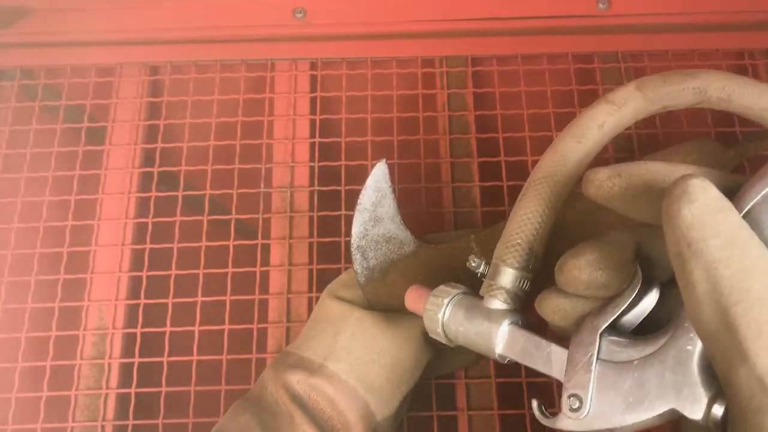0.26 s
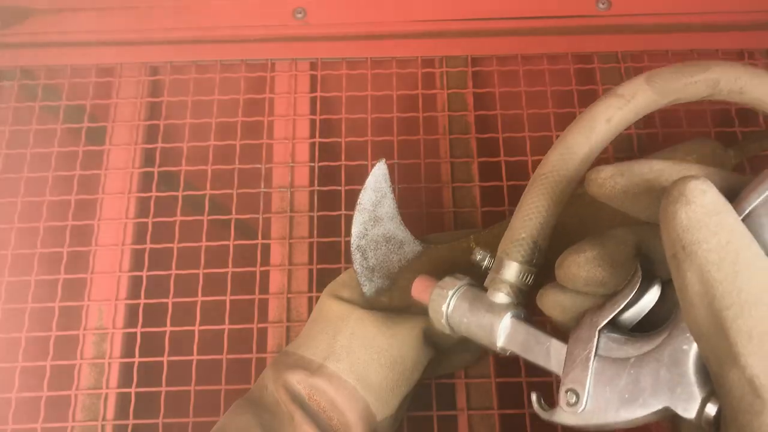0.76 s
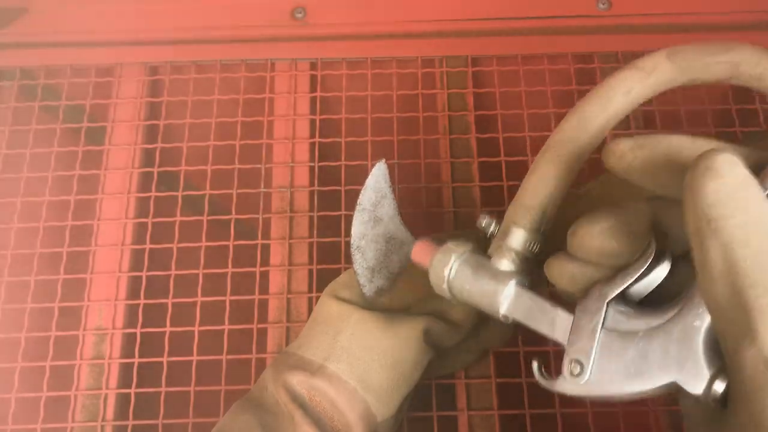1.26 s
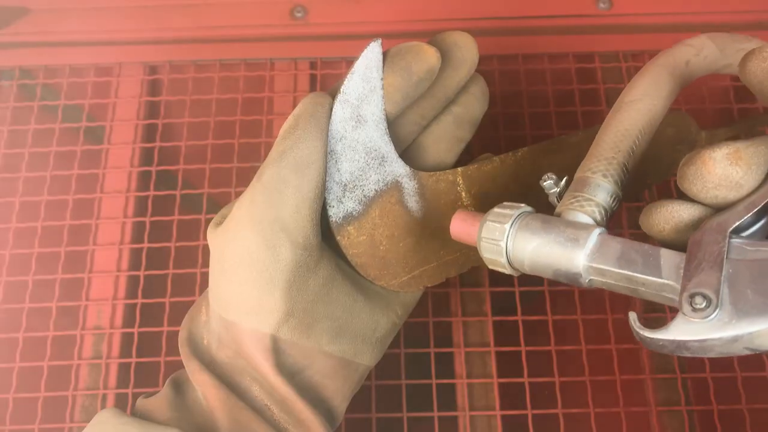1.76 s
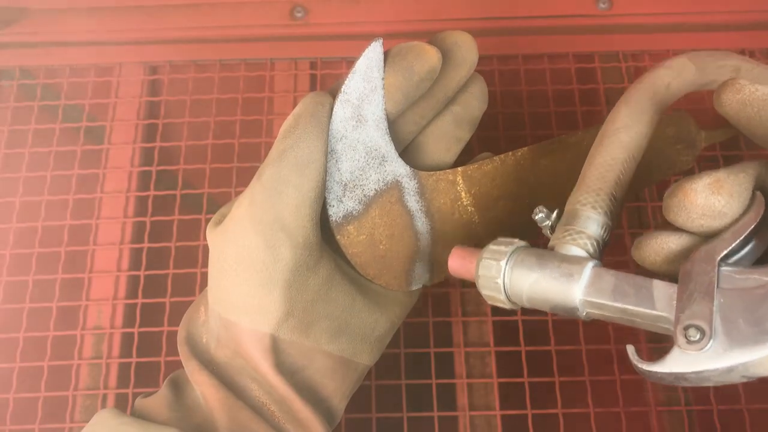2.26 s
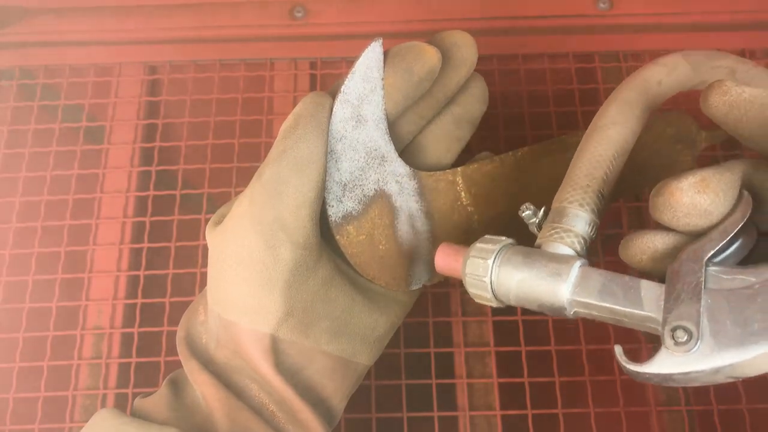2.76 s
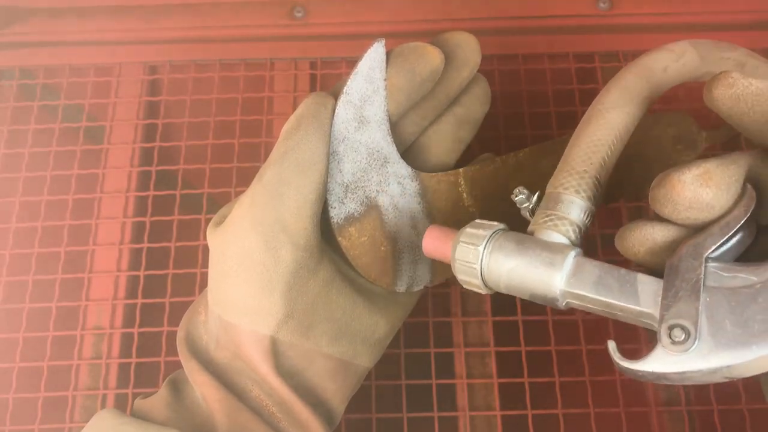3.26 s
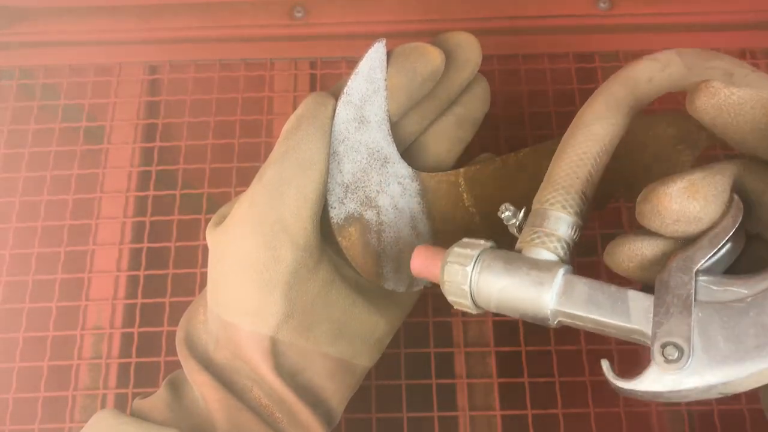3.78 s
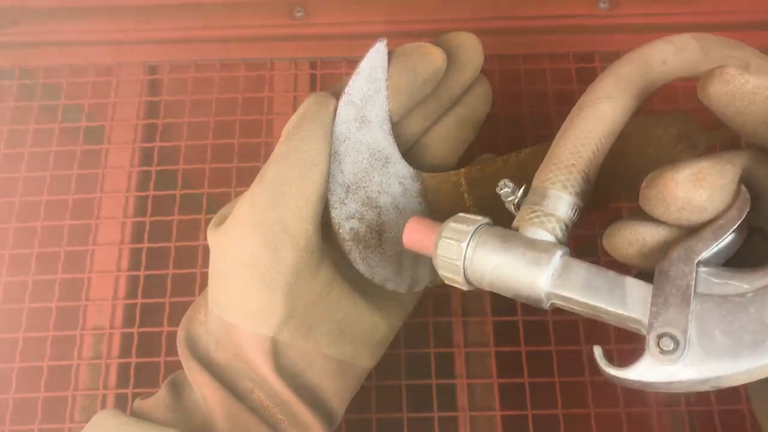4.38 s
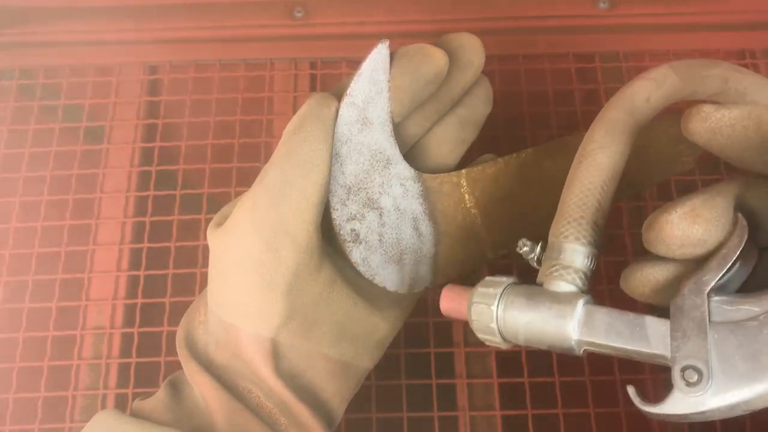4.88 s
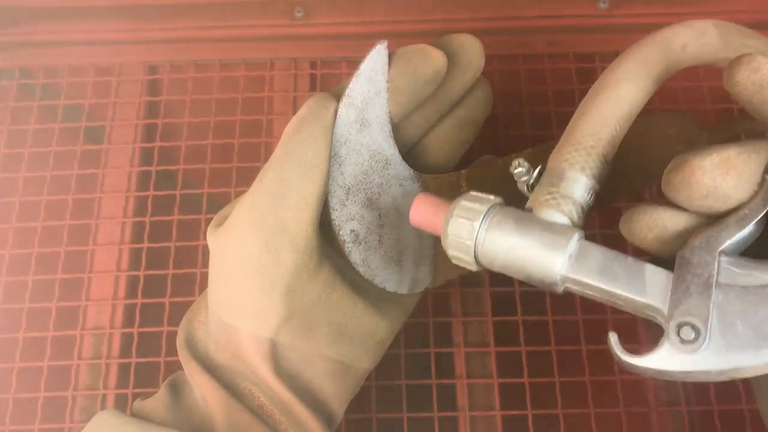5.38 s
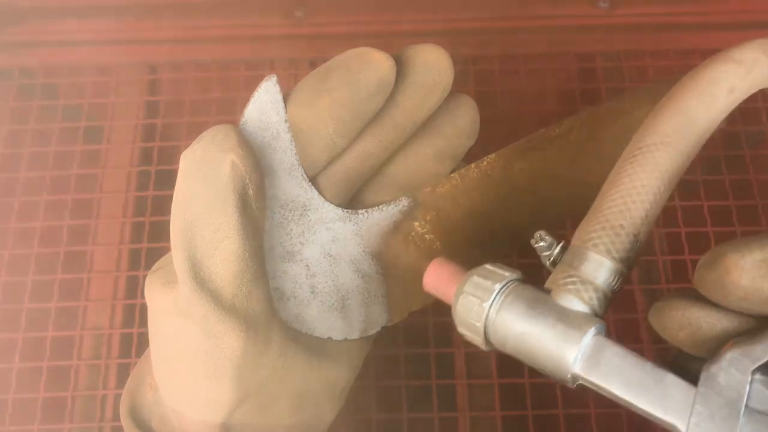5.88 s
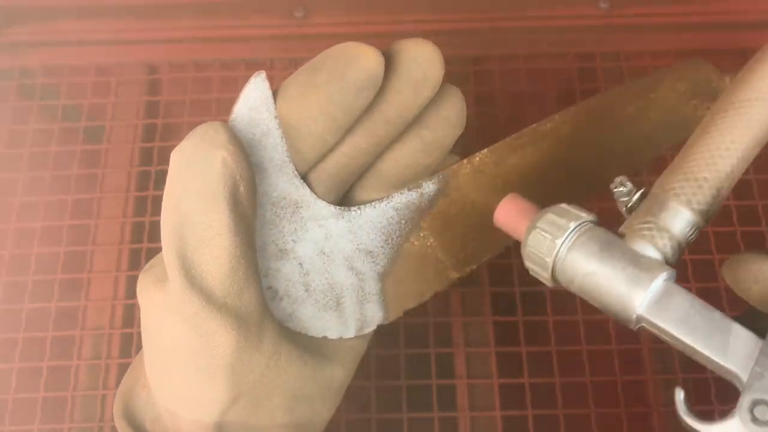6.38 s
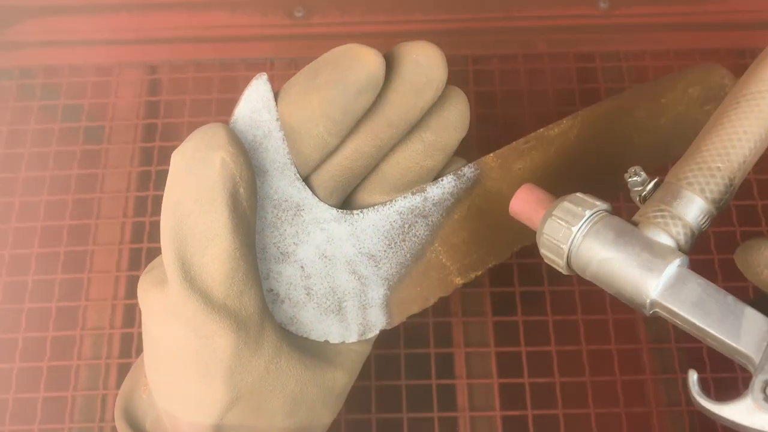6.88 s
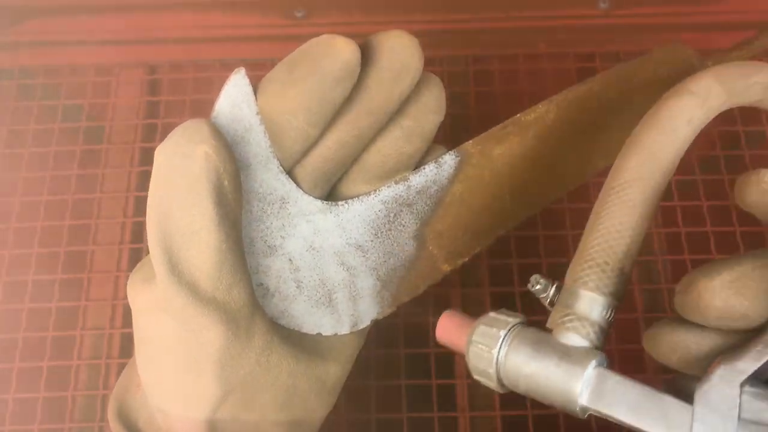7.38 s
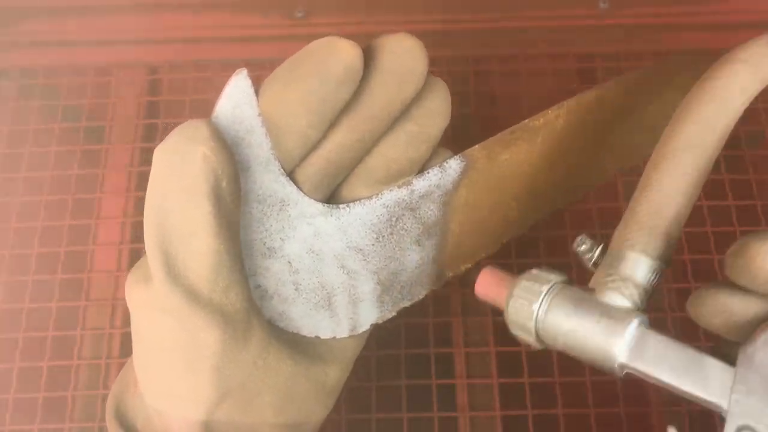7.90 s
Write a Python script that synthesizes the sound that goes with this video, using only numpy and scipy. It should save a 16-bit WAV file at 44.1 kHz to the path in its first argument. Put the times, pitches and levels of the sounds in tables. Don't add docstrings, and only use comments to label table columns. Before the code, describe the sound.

Dense gritty spray strikes steel, sputtering unevenly, with quick swells as the jet crosses edges. First it is bright and lively, then after a cut more even and drawn out, then after another cut calmer hiss broken by sharp metallic swishes. Under everything run an extractor's motor whine, a second fan's whistle and boxy air rush. Close two-channel microphone in a small metal cabinet.

```python
import sys
import numpy as np
from scipy import signal
from scipy.fft import rfft, irfft, next_fast_len
from scipy.io import wavfile
from scipy.ndimage import uniform_filter1d

SR = 44100
rng = np.random.default_rng(int(sys.argv[2]) if len(sys.argv) > 2 else 0)


def log_audio(samples):
    frames = np.atleast_2d(samples).T
    limited = np.clip(frames, -1, 1)
    pcm = np.round(limited * 32767).astype(np.int16)
    wavfile.write(sys.argv[1], SR, pcm)


def gain_from_db(level_db):
    decades = np.asarray(level_db, float) / 20
    return 10 ** decades


N = 358974
T = np.arange(N) / SR
HZ = np.maximum(np.fft.rfftfreq(next_fast_len(N), 1 / SR), 1)

# start_s, end_s
HOLDS = [
    (0, 1.506),
    (1.506, 5.666),
    (5.666, 8.14),
]
GATES = [uniform_filter1d(1. * ((T >= start_s) & (T < end_s)), size=90, mode="nearest")
         for start_s, end_s in HOLDS]

# freq_hz, density_db_per_hz
GRIT_SPECTRUM = [(5000, -30.5), (7600, -8), (8800, -4), (9700, -2.5), (10700, -2.5), (12050, 0.5),
                 (13000, -3), (13900, -3.5), (14500, -7.5), (15800, -11)]
# freq_hz, width_hz, level_db
PANELS = [(2450, 99, -20), (2783, 75, 5.5), (3116, 71, 3.5), (3377, 92, 3.5), (3578, 36, 6.5),
          (3843, 33, 6.5), (4057, 25, 7.5), (4443, 75, 6.5), (4735, 59, 6.5), (4930, 110, 5.5),
          (5400, 86, -6)]
# freq_hz, width_hz, level_db
BLADE_TIP = [(5530, 51, -13), (7250, 150, -9), (8470, 33, -10), (9060, 48, -6), (9350, 51, -5),
             (9790, 220, -3), (10100, 110, -5), (10400, 100, -5), (10700, 120, -5), (11400, 70, -2),
             (12070, 170, 1), (12400, 43, -3), (13600, 54, -3), (14800, 93, -9)]
BLADE_FACE = [(5540, 100, -19), (5850, 48, -6), (6490, 54, -4), (6780, 32, -5), (7270, 45, -6),
              (7680, 110, -12), (8030, 90, -6), (9980, 110, -3), (11100, 70, -3), (11400, 120, -2),
              (12050, 90, 1), (13300, 71, -2), (13900, 66, -2), (15000, 200, -8)]
BLADE_HEEL = [(5480, 130, -8), (5830, 160, -9), (6740, 330, -7), (7220, 89, -5), (8200, 400, -9),
              (9140, 93, -4), (9670, 53, -1), (10400, 43, -2), (11100, 61, -1), (12070, 200, -1.5),
              (12800, 120, -1), (13700, 330, 0), (14500, 49, -5), (14800, 120, -6)]
FINE_OVER_DB = [-2.5, 1, -2]


def blasting():
    patter = ports(grains, over_hz(ALIKE))
    ring = ports(grains, 0.4)
    low = ports(grains, over_hz(ALIKE))
    panel_rattle = heard(low * modes(PANELS, flip=True))
    fine = 1 / (1 + (12500 / HZ) ** 16)
    feed_gain = gain_from_db(1.22 * walk(22))
    spot_gain = gain_from_db(2.35 * walk(16))
    grit_db, low_db = sweep()
    pivot_db = -36.5
    swell_db = pivot_db + 1.03 * (grit_db - pivot_db) + 2 * walk(13)
    blades = (BLADE_TIP, BLADE_FACE, BLADE_HEEL)
    lower_ring_db, upper_ring_db = (-3.0, 2.0, -2.0), (-3.5, -2.5, -3)
    split_hz = 7900
    out = 0
    for gate, over_db, blade, lower_db, upper_db in zip(
            GATES, FINE_OVER_DB, blades, lower_ring_db, upper_ring_db):
        fine_db = swell_db + over_db
        place = echoes(t60_s=.05, wet_db=-3)
        bright = patter * gain_from_db(over_hz(GRIT_SPECTRUM)) * place
        upper = ring * modes([m for m in blade if m[0] >= split_hz], flip=True)
        lower = heard(ring * modes([m for m in blade if m[0] < split_hz], flip=True))
        thud = .4 * heard(low * resonance(6600, 1200, 0) ** 2 * place)
        coarse = heard(bright * (1 - fine)) + gain_from_db(upper_db) * spot_gain * heard(upper * (1 - fine))
        finest = heard(bright * fine) + gain_from_db(upper_db - 3.0) * heard(upper * fine)
        steel = gain_from_db(grit_db) * coarse + gain_from_db(fine_db) * finest
        steel = steel + gain_from_db(low_db) * (thud + gain_from_db(lower_db) * lower)
        spent_grit = gain_from_db(0.72 * grit_db - 25.5) * panel_rattle
        out = out + gate * (steel + spent_grit)
    return out * gain_from_db(2.5) * feed_gain


# time_s, grit_on_steel_db, thick_part_ring_db
AIM = [(0, -33.5, -43.5), (.8, -34, -45.5), (1.5, -33, -44), (1.52, -36.5, -40), (1.9, -40, -51.5),
       (2.45, -38, -44), (2.95, -38, -48), (3.15, -36.5, -39), (3.5, -37, -46.5), (3.95, -35.5, -42),
       (4.25, -32.5, -38), (4.75, -35, -40), (4.97, -38.5, -47), (5.3, -32.5, -36.5), (5.65, -35, -38.5),
       (5.92, -40.5, -49.5), (6.1, -38, -51), (8.14, -36.5, -51)]
# time_s, half_length_s, grit_lift_db, ring_lift_db
STROKES = [(0.005, 0.05, 6, 9), (0.217, 0.018, 2.5, 6), (0.377, 0.062, 4.5, 4), (.465, .03, -2.5, -6),
           (.555, 0.019, 5.5, 10.5), (.715, .05, 4, 3), (0.967, .035, 2.5, 7), (1.06, .03, 2.5, 4),
           (1.258, .04, 3, 6), (1.53, 0.029, 3, 4.5), (2.23, 0.065, 6.5, -4), (2.607, 0.088, 2, 5),
           (2.765, .035, 0, 5.5), (3.302, 0.082, 1, 3), (3.6, .03, 1.5, 3), (3.677, .025, -1.5, 9),
           (3.74, 0.064, 3, 4.5), (4.27, 0.013, -0.5, 5), (5.54, 0.025, 2.5, 2), (5.845, 0.027, 5, 9.5),
           (6.025, 0.04, 5.5, 10), (6.235, 0.035, 3, 12), (6.465, 0.049, 10.5, 19), (6.915, 0.1, 7, 16.5),
           (7.237, 0.04, 5, 6), (7.436, 0.027, 8.5, 11), (7.589, .025, 8.5, 10), (7.735, 0.022, 10, 15),
           (7.935, 0.028, 7.5, 12), (8.075, 0.053, 5.5, 18.5)]


def sweep():
    grit_db, low_db = over_time(AIM)
    for time_s, half_s, grit_lift_db, ring_lift_db in STROKES:
        bell = np.exp(-((T - time_s) / half_s) ** 2)
        grit_db = grit_db + grit_lift_db * bell
        low_db = low_db + ring_lift_db * bell
    return grit_db, low_db + 1.5 * walk(14)


def grains(spread_db=3.0):
    hardness_db = spread_db * np.minimum(rng.exponential(size=N), 5)
    return rng.standard_normal(N) * gain_from_db(hardness_db)


# freq_hz, density_db_per_hz
JET_SPECTRUM = [(1410, -46), (2400, -13), (2520, -32), (2810, -15.5), (3040, -31.5), (3530, -13.5),
                (4570, -9), (5180, -9.5), (6600, -6.5), (7660, -7.5), (11800, -3), (13900, 1), (15600, -6)]


def jet():
    hiss = ports(turbulence, .95 * over_hz(ALIKE))
    direct = heard(hiss * gain_from_db(over_hz(JET_SPECTRUM)) * (HZ > 2300) * echoes(t60_s=.06, wet_db=-3))
    drumming = heard(hiss * modes(PANELS, flip=True))
    return (direct + gain_from_db(-20.0) * drumming) * gain_from_db(-31.5 + duck() + 1.0 * walk(12))


def turbulence():
    return rng.standard_normal(N)


def extractor():
    return (motor() + second_fan() + air_rush()) * gain_from_db(duck())


# shaft_order, level_db_rms, left_minus_right_db, left_lead_rad
SHAFT_ORDERS = [(1, -59, 0, -.5), (2, -55, 0, -.3), (3, -66, 0, -.3), (4, -55, -1, -.2), (5, -51, 0, -.5),
                (7, -51, 0, -.9), (8, -50.5, -1, -1.0), (9, -60, 0, -.7), (10, -62, 0, -.7),
                (12, -56.5, -3, -.7), (13, -60, 0, 1.2), (14, -64, 3, 1.5), (15, -58, -3, 1.2),
                (16, -45, -6, 1.0), (17, -67, -2, 1.0), (20, -67, -2, 1.5), (26, -65, 0, .5),
                (28, -61, 0, -.2)]
SKIPS = [
    (.266, 0),
    (-.243, .49),
]


def motor():
    order_16_hz = 2219.6 + 1.0 * T + sag(start_s=6.86, lowest_s=7.03, back_s=7.27, loss_hz=5.5)
    turns = np.cumsum(order_16_hz / 16) / SR
    shaft_skips = np.transpose(SKIPS)[0]
    orders = [(tone(order * turns, level_db, pan_db, lead_rad) * splice(shaft_skips, order)).real
              for order, level_db, pan_db, lead_rad in SHAFT_ORDERS]
    orders[0] = orders[0] * gain_from_db(4.5 * GATES[0])
    mains = tone(300.5 * T, -65.5, 0, -.3).real
    return sum(orders) * gain_from_db(0.11 * walk(25.07)) + mains


# time_s, pitch_hz
WHISTLE = [(0, 1538.3), (2.9, 1536), (3.7, 1539), (5.66, 1539), (5.68, 1537.6), (7.45, 1537.5),
           (8.14, 1540.5)]


def second_fan():
    pitch_hz = over_time(WHISTLE)[0] + sag(start_s=6.87, lowest_s=7.07, back_s=7.42, loss_hz=11)
    turns = np.cumsum(pitch_hz) / SR
    fan_skips = np.transpose(SKIPS)[1]
    return (tone(turns, -39 + 0.13 * walk(30), 0, -0.84) * splice(fan_skips, 0.96)).real


# freq_hz, density_db_per_hz
RUSH_SPECTRUM = [(25, -42), (70, -60), (105, -67), (180, -29.5), (260, -22.5), (350, -37), (620, -17.5),
                 (900, -10), (1300, -19), (1450, -14), (1600, -17), (2100, -16.5), (2500, -26.5),
                 (4000, -62)]
# freq_hz, width_hz, level_db
HOLLOW = [(480, 9.3, -4), (504.7, 30, 3), (826, 11.6, -5), (1074, 56, -5), (1206, 47, -8), (1996, 120, -16)]


def air_rush():
    low_cut = 1 / np.hypot(1, (125 / HZ) ** 2)
    color = np.hypot(gain_from_db(over_hz(RUSH_SPECTRUM)), abs(modes(HOLLOW)))
    return heard(ports(turbulence, over_hz(ALIKE)) * low_cut * color) * gain_from_db(-37.5)


def tone(turns, level_db, pan_db, lead_rad):
    side = gain_from_db(pan_db / 2) * np.exp(.5j * lead_rad)
    return np.outer([side, 1 / side], np.sqrt(2) * gain_from_db(level_db) * np.exp(2j * np.pi * turns))


def splice(skips, order):
    skipped_turns = np.cumsum([0, *skips])
    return sum(gate * np.exp(2j * np.pi * order * turns) for gate, turns in zip(GATES, skipped_turns))


def sag(start_s, lowest_s, back_s, loss_hz):
    return -np.interp(T, [start_s, lowest_s, back_s], [0, loss_hz, 0])


def resonance(freq_hz, width_hz, level_db):
    damping = 1j * width_hz * HZ
    return gain_from_db(level_db) * damping / (freq_hz ** 2 - HZ ** 2 + damping)


def modes(table, flip=False):
    return sum((-1) ** (k * flip) * resonance(*row) for k, row in enumerate(table))


def echoes(t60_s, wet_db):
    taps = 4096
    tail = rng.standard_normal((2, taps)) * np.exp(-np.log(1000) * T[:taps] / t60_s)
    tail = tail / np.sqrt(np.sum(tail ** 2, axis=1, keepdims=True))
    return (1 + gain_from_db(wet_db) * rfft(tail, next_fast_len(N))) / np.sqrt(1 + gain_from_db(2 * wet_db))


# freq_hz, likeness_0_to_1
ALIKE = [(60, .93), (250, .95), (380, .65), (500, .95), (1100, .88), (1400, .5), (2000, .3), (3300, .4),
         (4000, .75), (5400, .6), (7000, .8), (8000, .5), (11000, .8), (12500, .55), (15500, .6)]
# freq_hz, left_minus_right_db
BALANCE = [(60, 0), (250, 0), (450, -3.6), (650, 0), (1600, 0), (1900, 3), (2200, -3), (3000, -.3),
           (7000, .5), (11000, -1.6), (15500, -6.5)]
# freq_hz, left_lead_rad
LEAD = [(60, -.4), (250, -.5), (500, -.1), (1100, -.9), (1600, -.7), (2300, 1.2), (3600, .8), (4000, -.1),
        (6000, -.3), (7000, -1.0), (7800, -2.8), (9200, -4.9), (10800, -6.3), (12800, -7.4), (13600, -6.2),
        (15700, -3.4)]


def ports(excite, alike):
    common, *own = (rfft(excite(), next_fast_len(N)) for _ in range(3))
    alike = np.clip(alike, 0, 1)
    side = gain_from_db(over_hz(BALANCE) / 2) * np.exp(.5j * over_hz(LEAD))
    mixed = np.sqrt(alike) * common + np.sqrt(1 - alike) * np.array(own)
    return np.array([side, 1 / side]) * mixed


def heard(spectra):
    x = irfft(spectra, next_fast_len(N))[:, :N]
    return x / np.sqrt(np.mean(x ** 2))


def over_hz(table):
    freq_hz, value = np.transpose(table)
    return np.interp(np.log(HZ), np.log(freq_hz), value)


def over_time(table):
    time_s, *columns = np.transpose(table)
    return [np.interp(T, time_s, column) for column in columns]


def walk(rate_hz):
    k = int(SR / rate_hz)
    steps = np.repeat(rng.standard_normal(N // k + 1), k)
    return 0.92 * uniform_filter1d(uniform_filter1d(steps, k), k)[:N]


# cut_s, depth_db, hold_s, release_s
DUCKS = [
    (1.498, -3, 0.25, .12),
    (5.666, -2.0, .03, 0.53),
]


def duck():
    gain_db = 0.5
    for cut_s, depth_db, hold_s, release_s in DUCKS:
        corners_s = np.cumsum([cut_s, .02, hold_s, release_s])
        gain_db = gain_db + np.interp(T, corners_s, [0, depth_db, depth_db, 0])
    return gain_db


def scene():
    return blasting() + jet() + extractor()


def roll_off(x):
    return signal.sosfilt(signal.butter(12, 15765, fs=SR, output="sos"), x)


def record(dry):
    clean = signal.sosfilt(signal.butter(1, 102, "high", fs=SR, output="sos"), dry)
    ticks = sum(np.exp(-((T - start_s) / .001) ** 2) for start_s, _ in HOLDS[1:])
    return roll_off(clean + gain_from_db(-52) * ticks)


dry = scene()
out = record(dry)
log_audio(out)
```